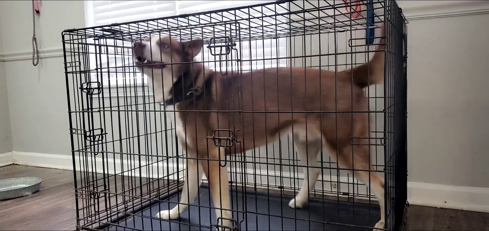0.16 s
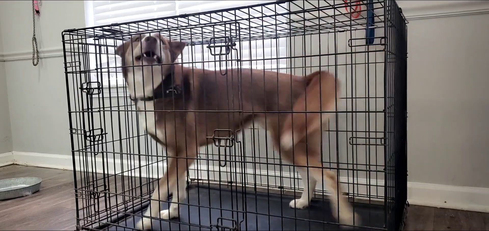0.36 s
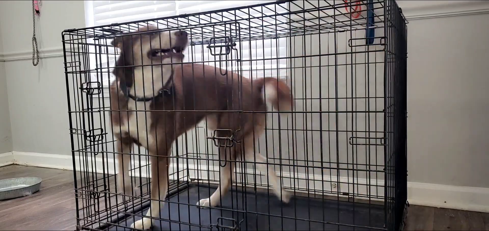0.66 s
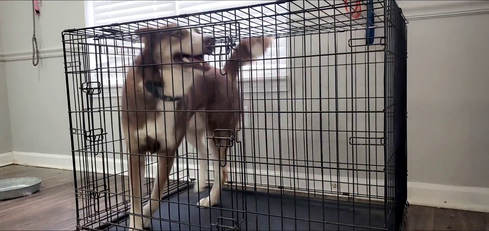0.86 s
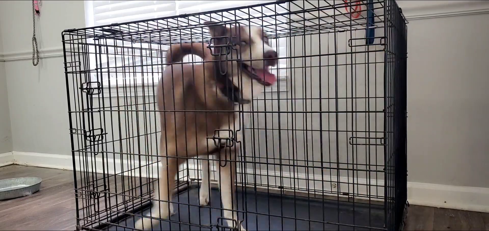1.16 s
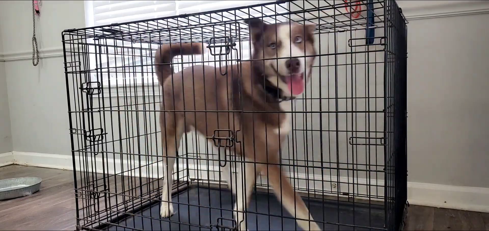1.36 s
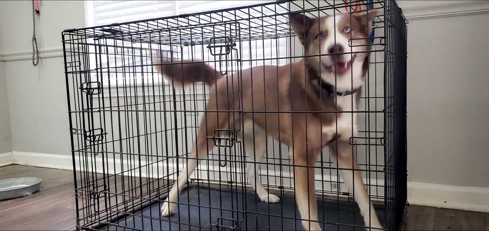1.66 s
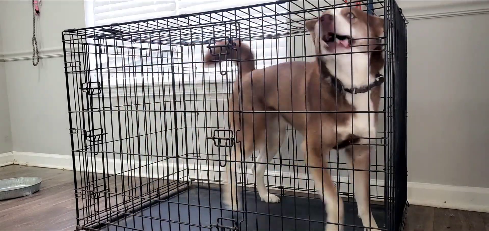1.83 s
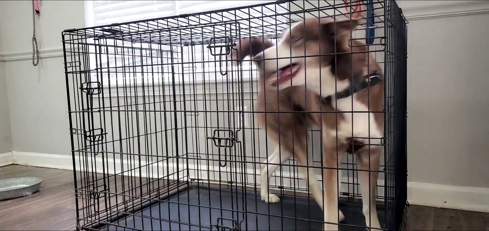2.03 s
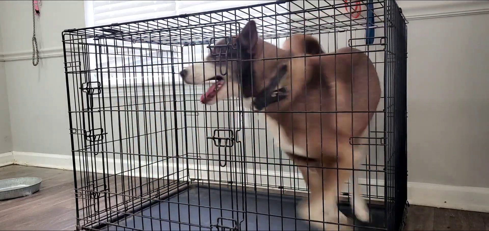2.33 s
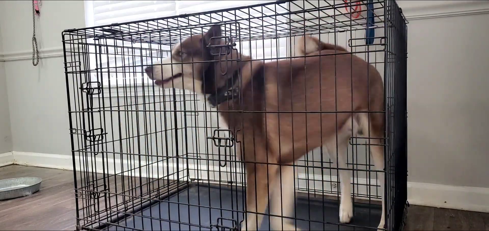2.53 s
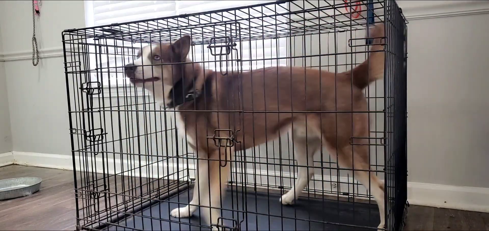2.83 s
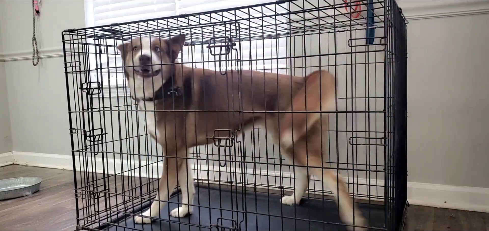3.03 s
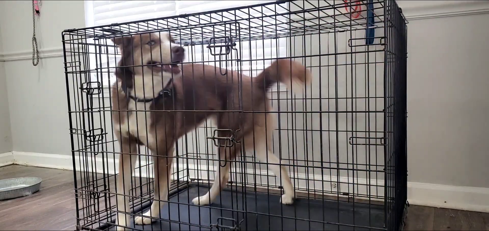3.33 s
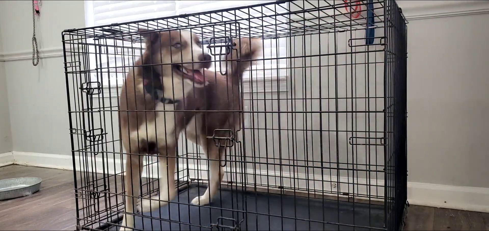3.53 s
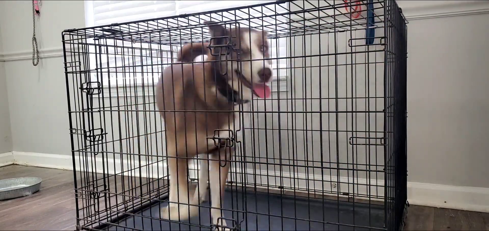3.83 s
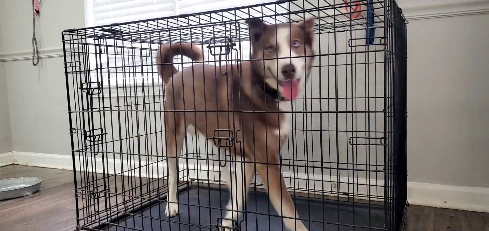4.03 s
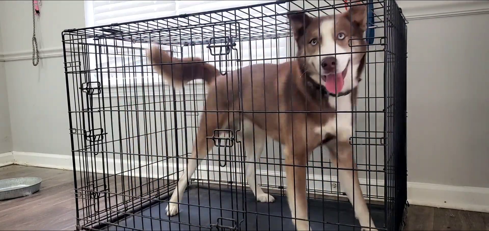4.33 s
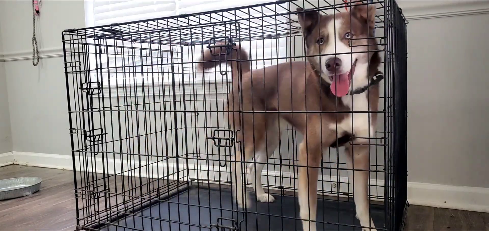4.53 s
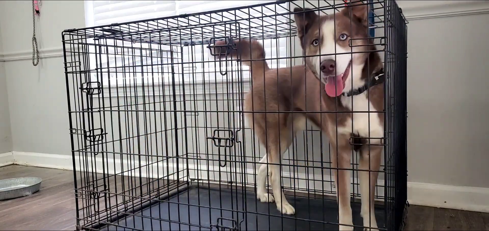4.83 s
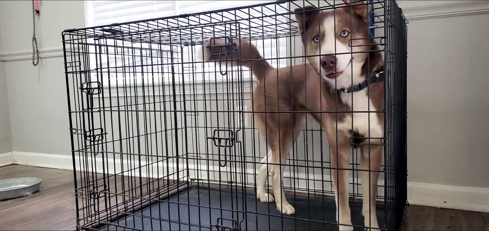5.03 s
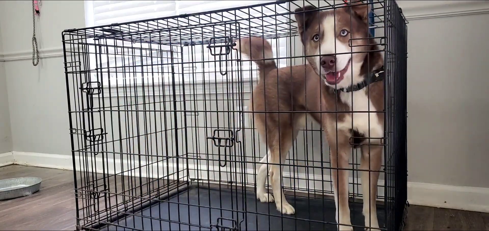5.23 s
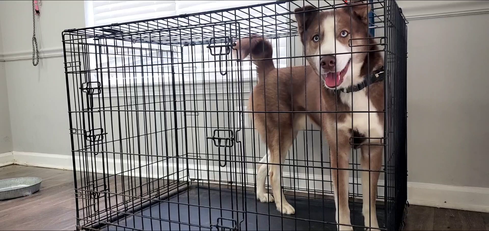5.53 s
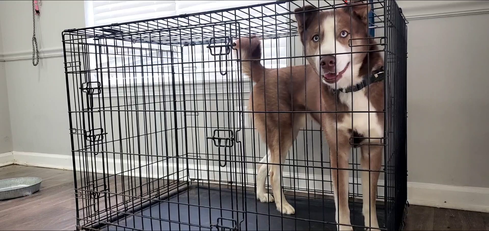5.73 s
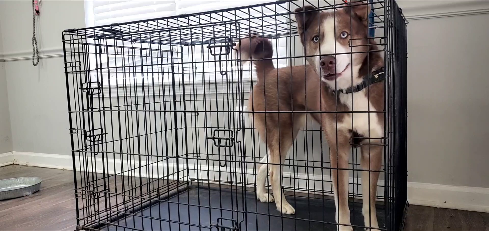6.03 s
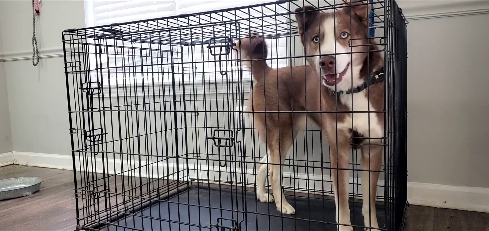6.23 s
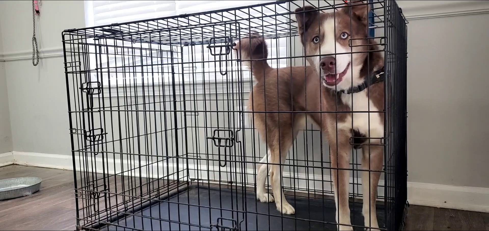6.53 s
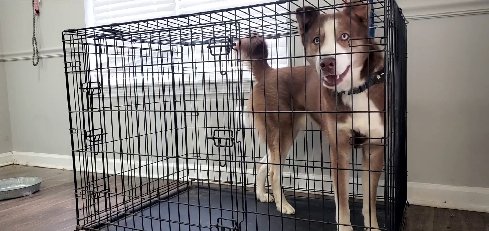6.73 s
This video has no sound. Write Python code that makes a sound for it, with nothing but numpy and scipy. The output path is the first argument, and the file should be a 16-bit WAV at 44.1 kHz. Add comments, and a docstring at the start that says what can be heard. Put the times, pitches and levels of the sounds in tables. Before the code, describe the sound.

A bare, hard room rings from an earlier cry as a crated dog gives a short falsetto yelp at 0 s and another at 0.3 s, with a thin nasal whistle around 4.8 kHz between. From 0.5 to 1.6 s come mostly light claw clicks on wire and paw rattles on the plastic tray. At 1.7-2.2 s, quick whimpers jump upward in pitch, with more whistle. Around 2.45-3.05 s the cries crowd together, hoarse and cracking between registers, amid sharp metallic clicks and tray rattles; another bends at 3.2-3.4 s. Pacing noises continue, with a faint low whimper at 4.7 s, and stop near 4.9 s. A clear wavering whine lasts from 5.0 to 5.3 s. After a quiet gap, piercing nose whistles and tiny high squeaks come at 5.7-6.3 s and again at 6.6-6.88 s, echoing over faint room tone.

```python
"""A husky whines in a wire crate in a bare, echoing room: nearly pure falsetto tones with a few overtones,
some cracking between registers, with breath noise. A thin nasal whistle, a swept sine with side tones and a
little air noise, runs between and over the cries. Claws and collar click on the wires as noise cracks with
ringing modes; paws rattle and thump the plastic tray as decaying noise. Behind lie shaped noises: the room
ringing from an earlier cry, then fur and feet brushing, and a faint room tone.
"""
import sys
import numpy as np
from scipy import signal
from scipy.fft import rfft, irfft, next_fast_len
from scipy.io import wavfile
from scipy.ndimage import uniform_filter1d, minimum_filter1d

SR = 44100
rng = np.random.default_rng(int(sys.argv[2]) if len(sys.argv) > 2 else 0)


def store_pcm(level_fs):
    """Save levels as 16-bit WAV."""
    pcm = np.round(np.clip(level_fs, -1, 1) * 32767).astype(np.int16)
    wavfile.write(sys.argv[1], SR, np.atleast_2d(pcm).T)


N = 303452
TIME = np.arange(N) / SR   # s

# All levels in the tables are relative: the functions trim them further. Spectra give density per Hz.
# Room tone spectrum: freq_hz, density_db
ROOM_TONE_SPECTRUM = [(25, -33), (60, 3), (120, -6.5), (300, -9), (1000, -20), (4000, -19.5), (16000, -65)]
# Reverberation time across the spectrum: freq_hz, t60_s
ROOM_DECAY = [(100, 0.16), (400, 1.8), (700, 1.17), (1400, 1.09), (2500, 1.13), (5000, 1), (9000, 0.69),
              (16000, 0.65)]
# Background level: at the start the room ringing from an earlier cry, then fur and feet brushing:
# start_s, level_db
BACKGROUND_LEVEL = [(0, -28.5), (.7, -41), (1.4, -39.5), (2.2, -43), (2.9, -31.5), (3.6, -39), (4.3, -36.5),
                    (4.6, -44)]
# Spectrum of that background: freq_hz, density_db
BACKGROUND_SPECTRUM = [(24, -47), (40, -29.5), (64, -6.5), (159, -14.5), (433, -16), (663, -3), (790, 3),
                       (990, -2), (1240, -0.5), (2380, -6.5), (3560, -18.5), (5050, -17), (8770, -26.5),
                       (16000, -28)]
# Paws on the tray: start_s, rattle_db, thud_db
PAW_STEPS = [(0.517, -27, -62), (0.932, -32, -54), (1.227, -19, -54), (1.559, -31.5, -52),
             (2.213, -27.5, -70), (2.61, -24, -42), (2.891, -18.5, -41), (3.484, -26.5, -64),
             (3.796, -30.5, -62.5), (3.916, -26.5, -53.5), (4.178, -29.5, -69), (4.373, -33, -54),
             (4.753, -32, -58), (4.903, -36, -56)]
# Spectrum of the rattling plastic: freq_hz, density_db
RATTLE_SPECTRUM = [(24, -61), (40, -31), (64, -6.5), (106, -22), (290, -13), (319, -14.5), (514, -17),
                   (653, 0), (869, -13), (1050, -9), (1370, -13.5), (2670, -16.5), (4100, -25),
                   (12000, -35), (15600, -57), (22000, -120)]
# Spectrum of the floor under the tray: freq_hz, density_db
THUD_SPECTRUM = [(30, -22.5), (65, -2.5), (105, -3), (200, -16), (500, -40)]
# Claws and collar touching the wires: start_s, treble_db, middle_db
WIRE_CLICKS = [(0.2314, -40, -32.5), (0.704, -38, -29), (0.9285, -29, -20), (1.0067, -38, -28),
               (1.22, -31.5, -25.5), (1.568, -49, -28), (1.7752, -26.5, -20), (2.374, -31, -30.5),
               (2.608, -24, -20.5), (2.8768, -31, -43), (3.4823, -26.5, -28.5), (3.56, -38.5, -28),
               (3.8033, -34.5, -30), (4.1807, -32.5, -20.5), (4.4268, -34, -25), (4.7482, -40, -30),
               (4.875, -33.5, -28.5), (4.9043, -38.5, -24)]
# Resonances of the wires: freq_hz, width_hz (sets how fast each dies), level_db
WIRE_MODES = [(2198, 450, 4), (3520, 380, -15), (3860, 30, -17), (4160, 110, -18), (5100, 30, 24),
              (5300, 25, -11), (5700, 60, -6), (5960, 130, -2.5), (6960, 44, -32), (7200, 17, 2),
              (7500, 36, -23), (8950, 46, 1)]
# Treble part of a click: freq_hz, density_db
TICK_SPECTRUM = [(1760, -44.5), (3000, -28.5), (5000, 1.5), (5480, -6), (7250, 0.5), (8110, -9),
                 (15000, -0.5), (16000, -12.5)]
# Middle part of a click: freq_hz, density_db
CLACK_SPECTRUM = [(530, -34), (900, 0), (1100, 0.5), (1610, -7.5), (1930, -3), (2610, -2), (3120, -2.5),
                  (3710, -5.5), (7000, -13.5), (9100, -27), (15400, -120)]
# Left/right balance and lag of the dog's sound over time: time_s, left_minus_right_db, left_lag_s
STEREO_BALANCE = [(0, -1.5, 0.00042), (.4, -4, 0.00048), (1.9, -5.5, 0.00013), (2.5, -1, 0.00043),
                  (3.3, 2, 0.00047), (4.7, -9.5, 0.00013), (5.15, -5.5, 0.00014), (6, -2, 0.00015),
                  (6.88, -5.5, 0.00013)]
# Hiss of air past the vocal folds: freq_hz, density_db
MOUTH_AIR_SPECTRUM = [(1940, -44), (3300, -18), (3620, -2.5), (3870, -35), (4500, -21.5), (4710, -28),
                      (4970, 11), (5380, -22), (5750, 11), (8430, -43), (14200, 1.5), (14800, -13),
                      (16000, -48.5)]
# Air noise of the nasal whistle: freq_hz, density_db
NOSE_AIR_SPECTRUM = [(1650, -89), (2800, -32), (3240, -12), (4430, -10), (4560, -22), (4840, 2), (5090, -9),
                     (6380, -3), (8420, -31.5), (9190, -7), (10300, -18), (13900, -9.5), (16000, -48)]
# Nasal whistles in two registers, near 4800 and 6400 Hz:
# start_s, length_s, start_hz, middle_hz, end_hz, level_db, octave_db (re the level)
NASAL_WHISTLES = [(0, .11, 4880, 4930, 4830, -49, -16), (.44, .1, 4830, 4745, 4760, -43, -14),
                  (1.805, .025, 4950, 4800, 4700, -33, -20), (1.862, .04, 4880, 4750, 4700, -35, -18),
                  (1.985, .25, 4720, 4850, 4810, -37, -11), (2.53, .44, 4980, 5070, 4900, -44, -10),
                  (3.32, .05, 5050, 5110, 5030, -50, 6), (5.625, .025, 4850, 5000, 5050, -55, -15),
                  (5.685, .12, 4600, 4780, 4740, -54, 6), (5.748, .085, 6340, 6460, 6400, -37, -18),
                  (5.828, .42, 4790, 4700, 4690, -36.5, -12), (6.265, .035, 4800, 4850, 4740, -41, -11),
                  (6.555, .02, 6000, 6300, 6450, -53, -22), (6.635, .035, 4950, 4780, 4730, -46, -8),
                  (6.658, .04, 6280, 6400, 6500, -39, -13), (6.755, .022, 6500, 6330, 6300, -39, -15),
                  (6.768, .112, 4860, 4815, 4780, -35, -20)]
# Overtones above the third harmonic, relative to it: freq_hz, level_db
THROAT_RESPONSE = [(1800, -0.5), (2300, 0), (2800, -11), (3500, -29), (4800, -33), (6000, -25.5),
                   (8200, -31), (10000, -30.5), (12000, -36.5), (14500, -23.5)]
# Short cries that swell to a climax, where the pitch turns, then fade:
# start_s, length_s, climax (share of the length), start_hz, climax_hz, end_hz, peak_db, swell_db,
# second_db and third_db (harmonics re the fundamental), hoarseness (pitch jitter as a share)
SHORT_CRIES = [(0, 0.12, 0.67, 794.5, 857.6, 693, -7, 5.7, -17, -33.5, 0.016),
               (.326, 0.1356, 0.613, 657.4, 724.6, 681.5, -6, 7.9, -11.5, -14.5, .011),
               (1.732, 0.064, 0.24, 704, 701.6, 708.6, -17, 1.4, -10.5, -19, 0.015),
               (1.79, 0.087, 0.54, 875, 960, 968, -28, 2, -31, -13, 0.06),
               (1.9, 0.082, 0.426, 1221, 1186, 1394, -7.5, 7.1, -18, -31, 0.001),
               (2.07, 0.14, 0.47, 1295, 1285, 1374, -16.5, 22, -15, -23, 0.002),
               (2.447, 0.0595, .25, 785, 811.4, 878, -6, 1.3, -15, -30.5, 0.0035),
               (2.51, 0.12, 0.44, 1129, 1230, 1240, -23.5, 2.2, -14.5, -17, 0.021),
               (4.675, 0.057, 0.42, 552.5, 497, 453, -28, 4.6, -26.5, -15.5, 0.02),
               (5.9, 0.11, 0.54, 1420, 1463, 1418, -18.5, 26.4, -34, -51, 0.00072),
               (6.274, 0.024, 0.32, 843, 820, 764, -18.5, 3.2, -23, -32, 0.017),
               (6.624, 0.068, .3, 933, 950, 990, -21.5, 11.4, -36, -34, 0.013),
               (6.775, 0.12, 0.47, 1232, 1360, 1408, -19, 7.5, -16.5, -29, 0.011)]
# Longer cries with a changing pitch, one curve each: some crack between registers, the last wavers:
# time_s, pitch_hz, level_db, second_db and third_db (harmonics re the fundamental),
# hoarseness (pitch jitter as a share)
LONG_CRIES = [
    [(2.655, 1040, -22, -10, -22, .034), (2.692, 990, -21, -14, -26, .03), (2.7, 912, -6, -28, -38, .003),
     (2.73, 918, -8, -28, -34, .004), (2.74, 1030, -23, -18, -25, .018), (2.8, 1010, -21, -13, -25, .018),
     (2.815, 920, -14, -21, -28, .009), (2.88, 945, -11, -21, -29, .008), (2.95, 950, -11, -20, -24, .011),
     (2.995, 900, -11, -17, -21, .016), (3.008, 700, -11, -17, -23, .032),
     (3.035, 670, -13, -23, -22, .032)],
    [(3.2, 640, -20, -2, -19, .006), (3.235, 578, -16, 4, -3, .006), (3.27, 694, -7, -12, -10, .008),
     (3.31, 688, -10, -15, -19, .018), (3.39, 670, -12, -18, -21, .024)],
    [(4.98, 705, -14, -18, -23, .006), (5, 680, -13, -17, -11, .005), (5.035, 748, -17, -16, -10, .014),
     (5.06, 682, -9, -21, -23, .004), (5.13, 722, -13, -25, -12, .004), (5.16, 700, -11, -27, -17, .003),
     (5.26, 732, -14, -27, -12, .003), (5.292, 686, -10.5, -28, -11, .004),
     (5.335, 660, -17, -17, -17, .008)],
]

CUTOFF_HZ = 16000
HALT_S, HALT_DB_PER_S, STANDING_DB = 4.75, 46, -54.5   # the brushing dies down to a floor
STEP_DECAY_S = 0.041
FADE_DB = 4.5        # from the climax to the end of a short cry
BRIGHTENING = .6     # dB that the second harmonic gains on the fundamental per dB of swell
GROWL_HZ, GROWL_DEPTH = 108.6, 8.4   # mean throb rate of a hoarse voice; depth per unit of pitch jitter


def from_db(db):
    """Decibels to gain."""
    return 10 ** (np.asarray(db) / 20)


def rms_one(x):
    """Scale to unit rms."""
    return x / np.sqrt(np.mean(x ** 2) + 1e-20)


def in_time(rows, t=TIME):
    """Read each column of a curve at the times t."""
    times, *columns = np.transpose(rows)
    return [np.interp(t, times, column) for column in columns]


def at_hz(points, hz):
    """Read a spectrum on a log-frequency axis."""
    knots, values = np.transpose(points)
    return np.interp(np.log(np.maximum(hz, 1)), np.log(knots), values)


def drift(rate_hz, size):
    """Smooth random wandering of spread 1: noise low-passed at rate_hz."""
    run_in = SR // 10   # lets the filter settle
    sos = signal.butter(2, rate_hz, fs=SR, output="sos")
    wandering = signal.sosfilt(sos, rng.standard_normal(size + run_in))
    return rms_one(wandering[run_in:])


def colour(x, spectrum):
    """Give x a spectrum, at unit rms."""
    size = next_fast_len(N)
    gain = from_db(at_hz(spectrum, np.fft.rfftfreq(size, 1 / SR)))
    coloured = irfft(rfft(x, size) * gain, size)
    return rms_one(coloured[..., :N])


def noise(spectrum):
    """Coloured noise, unrelated in the two channels."""
    return colour(rng.standard_normal((2, N)), spectrum)


def apart(hz, alike_hz=380, least=.1):
    """How much the two microphones differ in a diffuse field: long waves reach both nearly alike."""
    return np.clip((hz / alike_hz) ** 2, least, 1)


def diffuse(spectrum):
    """Coloured noise from all around."""
    mid, side = rng.standard_normal((2, next_fast_len(N)))
    hz = np.fft.rfftfreq(len(mid), 1 / SR)
    side = irfft(rfft(side) * apart(hz), len(mid))
    return colour(np.array([mid + side, mid - side]), spectrum)


def phrase(start, end, attack, release):
    """Samples of one utterance and its soft-edged gate."""
    at = np.flatnonzero((TIME > start - attack / 2) & (TIME < end + release))
    opening = (TIME[at] - start) / attack + .5
    closing = (end - TIME[at]) / release + 1
    return at, np.sin(np.pi / 2 * np.clip(np.minimum(opening, closing), 0, 1)) ** 2


def burst(start, rise, decay):
    """An envelope that swells from the start and dies away."""
    out = np.zeros(N)
    first = max(int(start * SR), 0)
    age = TIME[:min(SR // 2, N - first)]
    out[first:first + len(age)] = (1 - np.exp(-age / rise)) * np.exp(-age / decay)
    return out


def room_tone(level_db=-58.5):
    """The steady, faint noise of the room comes from all around."""
    return from_db(level_db) * diffuse(ROOM_TONE_SPECTRUM)


def room(x, wet_db, early=2.27, early_s=0.018):
    """Strong early reflections from near walls, then a tail whose decay time depends on frequency."""
    age = TIME[:SR * 3 // 2]
    hz = np.fft.rfftfreq(len(age), 1 / SR)
    mid, side = rfft(rng.standard_normal((2, len(age))))
    side = side * apart(hz)
    walls = np.array([mid + side, mid - side]) / np.sqrt(2)
    tail = 0
    for centre, t60 in ROOM_DECAY:
        # overlapping triangular bands, each with its own decay
        band = at_hz([(f, f == centre) for f, _ in ROOM_DECAY], hz)
        tail = tail + irfft(walls * band, len(age)) * from_db(-60 * age / t60)
    build_up = 1 - np.exp(-(age / 0.0072) ** 2)
    shape = build_up * (1 + early * np.exp(-age / early_s))
    energy = np.sum((shape * from_db(-60 * age)) ** 2)   # of a nominal one-second decay
    response = tail * shape / np.sqrt(energy)
    wet = signal.fftconvolve(np.broadcast_to(x, (2, N)), response, axes=1)
    return from_db(wet_db) * wet[:, :N]


def background(uneven_db=3.0):
    """Uneven shaped noise: the room ringing from an earlier cry, then fur and feet brushing, which dies down."""
    written_db, = in_time(BACKGROUND_LEVEL)
    halting_db = HALT_DB_PER_S * np.maximum(TIME - HALT_S, 0)
    level_db = np.maximum(written_db - halting_db, STANDING_DB)
    return from_db(level_db + uneven_db * drift(15.3, N)) * diffuse(BACKGROUND_SPECTRUM)


def tray(flicker_db=2.0):
    """A paw presses the plastic tray, which rattles against the wire floor and thuds on the boards."""
    presses = np.array([burst(start, 0.0047, STEP_DECAY_S) for start, _, _ in PAW_STEPS])
    rattle, thud = from_db(np.transpose(PAW_STEPS)[1:]) @ presses
    flicker = from_db(flicker_db * drift(120, N))
    return rattle * flicker * diffuse(RATTLE_SPECTRUM) + thud * diffuse(THUD_SPECTRUM)


def snaps(above_treble_db=19.0, lowest_hz=2400):
    """The first hard contact of each touch: a single bright, band-passed spike."""
    spikes = np.zeros(N)
    for start, treble_db, _ in WIRE_CLICKS:
        spikes[int(start * SR)] = from_db(treble_db + above_treble_db)
    sos = signal.butter(2, [lowest_hz, CUTOFF_HZ], "band", fs=SR, output="sos")
    return signal.sosfilt(sos, spikes + 1e-18)


def wires(tick_db=7.5, clack_db=5.0, ring_db=-15.5, chatter_db=-15.5, chatter_s=0.044,
          crack_s=0.0024, ring_t60=0.012, uneven_db=6.0):
    """Each touch is a short crack; the loose panels chatter after it and the wires ring."""
    treble, middle, ringing = np.zeros((3, N))
    chatter = from_db(chatter_db + uneven_db * drift(250, N))
    age = TIME[:SR // 2]
    hz, width, mode_db = np.transpose(WIRE_MODES)[:, :, None]
    t60 = ring_t60 * np.sqrt(np.median(width) / width)   # broad modes die sooner
    decay = from_db(mode_db - mode_db.max() - 60 * age / t60)
    modes = decay * np.sin(2 * np.pi * hz * age)
    for start, treble_db, middle_db in WIRE_CLICKS:
        touch = burst(start, 0.00024, crack_s) + chatter * burst(start, 0.0033, chatter_s)
        treble += from_db(treble_db + tick_db) * touch
        middle += from_db(middle_db + clack_db) * touch
        first = int(start * SR)
        mix = rng.random(len(WIRE_MODES))   # every touch excites the modes differently
        ringing[first:first + len(age)] += from_db(middle_db + ring_db) * (mix @ modes)
    return treble * noise(TICK_SPECTRUM) + middle * noise(CLACK_SPECTRUM) + ringing


def in_stereo(x, direct_db, wet_db, room_pan=0.45):
    """The direct sound lags in the left channel and its balance shifts; the room answers in both."""
    balance_db, lag = in_time(STEREO_BALANCE)
    sides_db = np.array([balance_db, -balance_db]) / 2
    direct = np.array([np.interp(TIME - lag, TIME, x), x])
    return from_db(direct_db + sides_db) * direct + room(x * from_db(room_pan * sides_db), wet_db)


def aspiration(folds, pressing, level_db=-26.0, chop=1.0):
    """Air hisses past the folds in time with their swing, more the harder they are pressed."""
    return from_db(level_db) * pressing * (1 + chop * folds) * noise(MOUTH_AIR_SPECTRUM)[0]


def whistle(folds, air_db=-11.0, beating=0.43, waver=0.0034, flicker_db=1.5, flicker_hz=30, third_db=-11.5):
    """A jet of air sings in the nose, bending in pitch; the swinging folds chop it into side tones."""
    tone, flow = np.zeros((2, N))
    for start, length, start_hz, middle_hz, end_hz, level_db, octave_db in NASAL_WHISTLES:
        at, gate = phrase(start, start + length, attack=0.013, release=0.032)
        along = np.clip((TIME[at] - start) / length, 0, 1)
        arch = np.polyfit([0, .5, 1], [start_hz, middle_hz, end_hz], 2)
        pitch = np.polyval(arch, along) * (1 + waver * drift(75, len(at)))
        phase = 2 * np.pi * np.cumsum(pitch) / SR
        low = gate * from_db(level_db + flicker_db * drift(flicker_hz, len(at)))
        high = gate * from_db(level_db + octave_db + flicker_db * drift(flicker_hz, len(at)))
        overtones = np.sin(2 * phase) + from_db(third_db) * np.sin(3 * phase)
        tone[at] += low * np.sin(phase) + high * overtones
        flow[at] += np.hypot(low, high)
    air = from_db(air_db) * flow * noise(NOSE_AIR_SPECTRUM)[0]
    return np.sqrt(2) * tone * (1 + beating * folds) + air


def cry_curve(start, length, climax, start_hz, climax_hz, end_hz, peak_db, swell_db, second_db, third_db, hoarse):
    """The course of a short cry, in the columns of a long one: its second harmonic follows the swell."""
    stages = [(0, start_hz, swell_db),   # share of the length, pitch, dB below the climax
              (np.clip(climax, .05, .95), climax_hz, 0),
              (1, end_hz, FADE_DB)]
    return [(start + share * length, hz, peak_db - below_db,
             second_db - BRIGHTENING * below_db, third_db, hoarse)
            for share, hz, below_db in stages]


def voice(shimmer_db=0.48, jitter_hz=260, rasp=2.0, quaver=.006, overtone_flicker_db=3.0, skew=0.35,
          lowest_hz=410):
    """Vocal folds in falsetto; returns the sound, the folds' swing and how hard they are pressed."""
    out, folds, pressing = np.zeros((3, N))
    for curve in [cry_curve(*row) for row in SHORT_CRIES] + LONG_CRIES:
        at, gate = phrase(curve[0][0], curve[-1][0], attack=.012, release=.016)
        size = len(at)
        pitch, level_db, second_db, third_db, jitter = in_time(curve, TIME[at])
        pitch = pitch * (1 + jitter * drift(jitter_hz, size) + quaver * drift(35.6, size))
        phase = 2 * np.pi * np.cumsum(pitch) / SR
        overtones_db = [second_db, third_db]
        overtones_db += [third_db + at_hz(THROAT_RESPONSE, k * pitch) for k in range(4, 17)]
        tone = np.sin(phase)
        for k, db in enumerate(overtones_db, 2):
            gain = from_db(db + overtone_flicker_db * drift(45, size))
            tone = tone + gain * np.sin(k * phase) * (k * pitch < SR / 2)
        # uneven closure spreads a little noise round each harmonic, more when the voice is hoarse
        flutter = from_db(shimmer_db * drift(41, size)) + rasp * jitter * drift(940, size)
        throb_hz = GROWL_HZ * (1 + 0.28 * drift(41, size))
        throb = np.sin(2 * np.pi * np.cumsum(throb_hz) / SR)
        swing = flutter + GROWL_DEPTH * jitter * throb
        out[at] += np.sqrt(2) * gate * from_db(level_db) * tone * swing
        folds[at] += gate * (np.sin(phase) + skew * np.cos(2 * phase))
        pressing[at] += gate * from_db(level_db + third_db)
    sos = signal.butter(4, lowest_hz, "high", fs=SR, output="sos")
    return signal.sosfilt(sos, out), folds, pressing


def scene():
    """Mix the dog, its crate and the room."""
    cries, folds, pressing = voice()
    dog = in_stereo(cries, direct_db=-1.0, wet_db=-3.5)
    breath = whistle(folds) + aspiration(folds, pressing)
    dog += in_stereo(breath, direct_db=1.5, wet_db=2.0)
    crate = wires() + snaps() + tray()
    return dog + crate + room(crate, wet_db=1.5) + background() + room_tone()


def record(dry, ceiling=.96, hold_s=.012):
    """A fast limiter ducks peaks above the ceiling, then a steep low-pass cuts the top."""
    span = int(hold_s * SR)
    gain = np.minimum(1, ceiling / (np.abs(dry).max(axis=0) + 1e-9))
    gain = uniform_filter1d(minimum_filter1d(gain, span), span)
    sos = signal.ellip(10, .2, 80, CUTOFF_HZ, fs=SR, output="sos")
    return signal.sosfilt(sos, gain * dry)


dry = scene()
out = record(dry)
store_pcm(out)
```